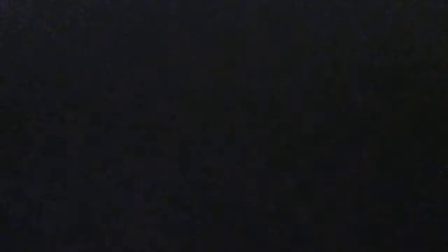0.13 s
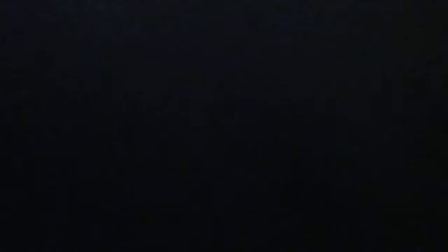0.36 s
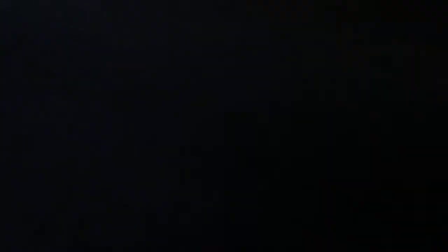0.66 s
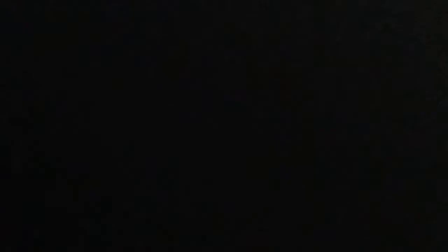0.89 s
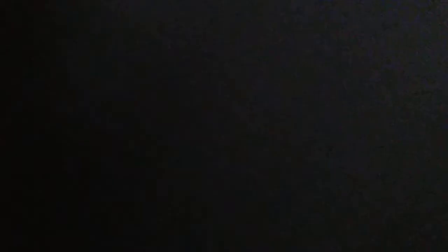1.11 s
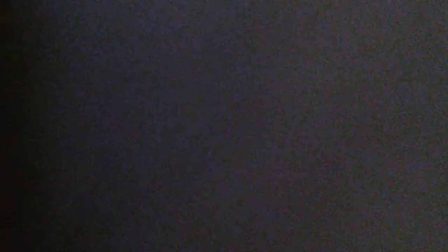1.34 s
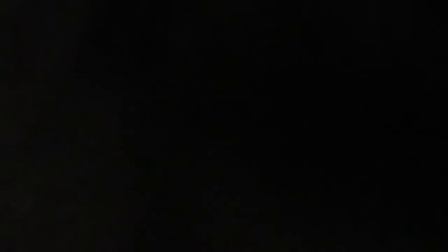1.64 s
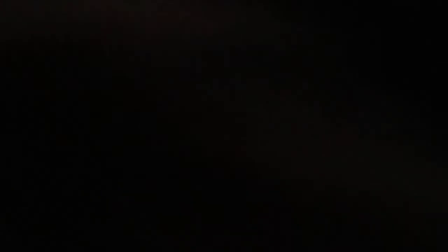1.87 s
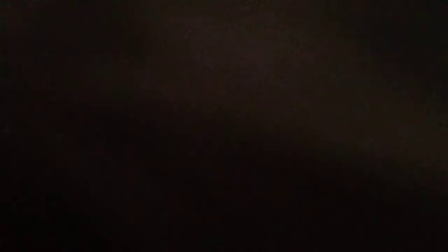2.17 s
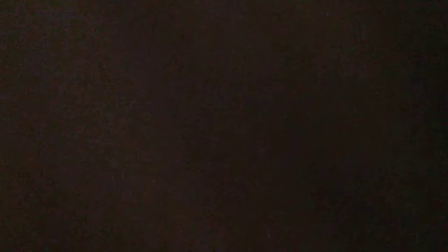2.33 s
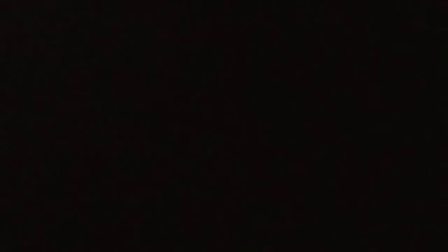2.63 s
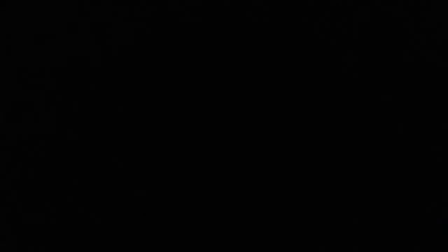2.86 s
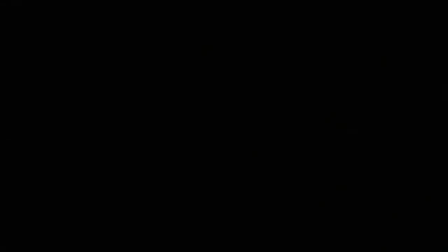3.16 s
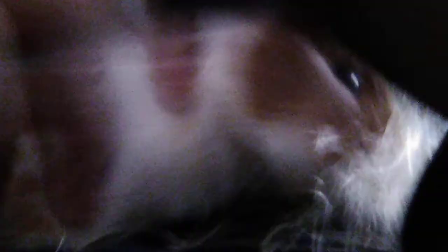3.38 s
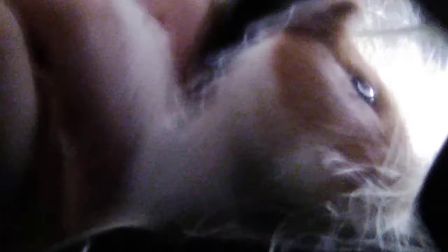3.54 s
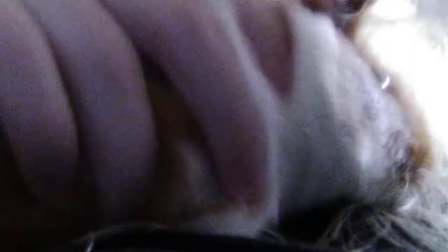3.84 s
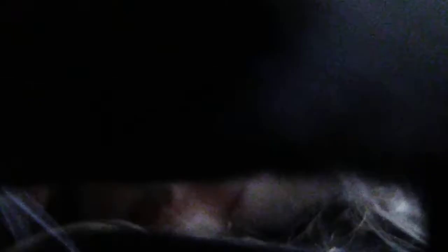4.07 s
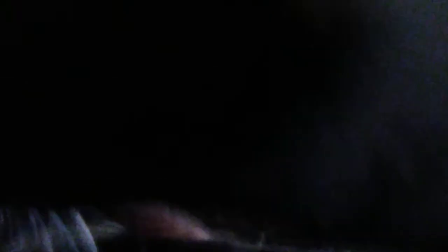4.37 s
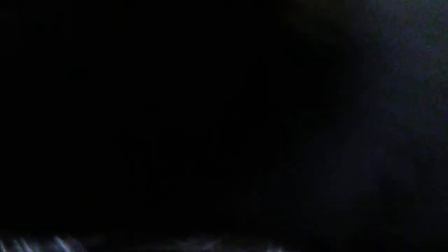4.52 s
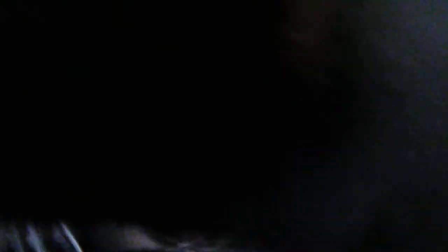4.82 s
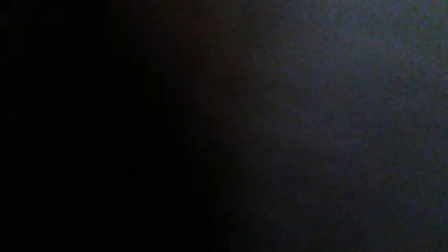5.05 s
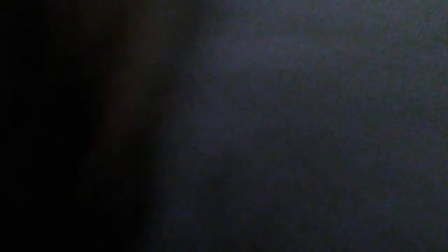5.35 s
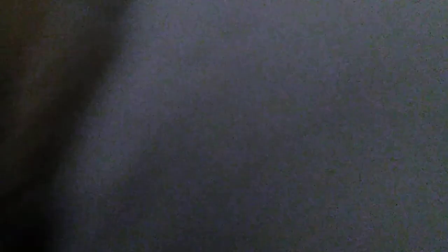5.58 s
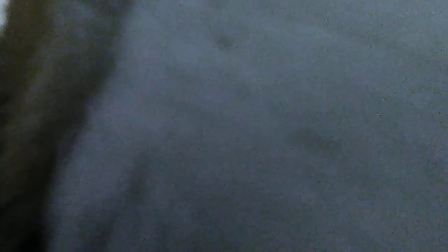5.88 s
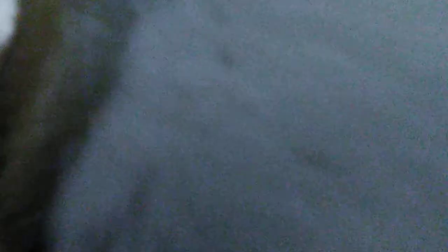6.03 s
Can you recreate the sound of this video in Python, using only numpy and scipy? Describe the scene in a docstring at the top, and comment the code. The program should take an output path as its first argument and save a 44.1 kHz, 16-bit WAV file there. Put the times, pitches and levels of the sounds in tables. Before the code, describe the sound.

A quick overlapping chatter of small rodent squeaks, some raspy, with soft rubbing, a sharp hay snap and late low bumps against the microphone.

```python
"""Baby guinea pigs peep in quick scooping calls inside a small hide, right at a half-covered microphone.
Each peep is a few gliding sine partials; urgent ones break into a rough half-pitch voice.
Fur and a hand rub and scuff the housing (shaped noise) and bump it (short low swings of a sine).
The hay bedding rustles (grainy bright noise) and snaps a few times (ringing modes). A faint hiss
lies under it all, and voices and hay get soft reflections."""
import sys
import numpy as np
from scipy import signal
from scipy.fft import rfft, irfft
from scipy.io import wavfile
from scipy.ndimage import map_coordinates

SR = 44100
rng = np.random.default_rng(int(sys.argv[2]) if len(sys.argv) > 2 else 0)


def transcribe(signal):
    """Save signal, clipped to [-1, 1], as a 16-bit WAV file at the path in sys.argv[1]."""
    frames = np.atleast_2d(signal).T
    limited = np.clip(frames, -1, 1)
    pcm = np.round(limited * 32767).astype(np.int16)
    wavfile.write(sys.argv[1], SR, pcm)


N = 273861
TIME = np.arange(N) / SR


def from_db(db):
    """Turn decibels into a gain."""
    return 10 ** (np.asarray(db) / 20)


def rms_one(x):
    """Scale to an average (rms) size of 1."""
    return x / np.sqrt(np.mean(x ** 2) + 1e-20)


def at_hz(points, hz):
    """Read a spectrum, joining its points by straight lines on a log-frequency axis."""
    point_hz, point_db = np.transpose(points)
    return np.interp(np.log(np.maximum(hz, 1)), np.log(point_hz), point_db)


def noise(colour):
    """Make noise with the given spectrum and rms 1."""
    hz = np.arange(N // 2 + 1) * SR / N
    white = rfft(rng.standard_normal(N))
    return rms_one(irfft(white * from_db(at_hz(colour, hz)), N))


def wander(t, rate):
    """Smooth random wobble of spread about 1, drawn through `rate` random values a second."""
    values = rng.standard_normal(4096)
    return map_coordinates(values, [t * rate], order=3, mode="wrap")


def add(out, start, x):
    """Mix x into out from the time start, in seconds."""
    i = max(int(start * SR), 0)
    out[i:i + len(x)] += x[:max(N - i, 0)]


def hiss():
    """Faint steady noise under everything."""
    # colour of the hiss: f/Hz, level/dB
    hiss_colour = [(100, 13), (500, 9), (1500, 2.5), (4000, 2), (9000, -1), (12500, -3), (14000, -21)]
    return from_db(-89.5) * noise(hiss_colour)


def rubbing(lumpy_db):
    """Fur sticks and slides on the housing: an uneven rumble that swells and fades with each stroke."""
    # strokes of fur over the housing: t/s at the top, level/dB, time to swell or fade by 10 dB/s
    strokes = [(.02, -67.5, 0.28), (.77, -54, 0.0765), (1.03, -66, 0.3322), (1.781, -61, 0.0085),
               (2.2, -77, 0.27), (2.5, -68.5, 0.0978), (2.66, -53.5, 0.0589), (3.14, -63.5, 0.21),
               (3.879, -52.5, 0.0543), (4.1, -55.5, 0.2038), (4.42, -71.5, 0.43), (5.15, -72, 0.02),
               (5.55, -43, 0.0229), (5.68, -43.5, 0.0952), (5.89, -39.5, 0.1039), (6.18, -53.5, 0.15)]
    # colour of the rumble: f/Hz, level/dB
    rub_colour = [(20, -8.5), (50, 3.5), (100, 5.5), (160, -4), (230, -16), (330, -21.5), (700, -31),
                  (1500, -36.5), (2200, -57.5), (5000, -60.5), (14000, -85)]
    power = from_db(-86) ** 2   # the hand never lies quite still
    for top, db, fade in strokes:
        stroke_db = db - 10 * np.abs(TIME - top) / fade
        power = power + from_db(stroke_db) ** 2
    lumps = from_db(lumpy_db * np.tanh(wander(TIME, 30)))
    return np.sqrt(power) * lumps * noise(rub_colour)


def scoop(u, start_hz, turn_hz, end_hz, turn):
    """The pitch glides into its turn and out again; u runs from 0 to 1 through the call."""
    ease = .52   # 0: a glide speeds up all the way from the turn; 1: it levels off at its far end
    away = np.interp(u, [0, np.clip(turn, .1, .9), 1], [1, 0, 1])
    glide = (1 - ease) * away ** 2 + ease * np.sin(np.pi / 2 * away) ** 2
    far_hz = np.where(u < turn, start_hz, end_hz)
    return turn_hz * (far_hz / turn_hz) ** glide


def peep(length, start_hz, turn_hz, end_hz, turn, level_db, swell_db, strain,
         jitter, flutter_db, rasp, slope_db, half_gain_db, rasp_db, shimmer_db):
    """A nearly pure scoop; under strain the vocal folds double their period and flutter."""
    # how each pitch comes through fur and hand: f/Hz, level/dB
    muffle = [(250, -16.5), (430, -5), (600, -8), (800, -0.8266), (1000, 0), (1300, 4), (1600, -1),
              (1850, -13.5), (2100, -10.5), (2400, -26.5), (3700, -19.5), (4600, -35), (8000, -47.5)]
    attack_s, release_s = .0085, 0.00903
    usual_pitch_hz = 925.9
    # second partial: level at the usual pitch, most that strain adds, change as the pitch rises
    overtone_db, overtone_strain_db, overtone_db_per_octave = -21.5, 12, -18
    t = np.arange(int(length * SR)) / SR
    u = t / length
    quaver = np.exp(.018 * wander(t, 130))   # a slight trembling of the pitch
    pitch = scoop(u, start_hz, turn_hz, end_hz, turn) * quaver

    # the voice breaks in fits, mostly in the middle of the call
    fits = from_db(flutter_db * wander(t, 77))
    rough = (0.005 + abs(strain)) * fits * np.sin(np.pi * u) ** 2
    overtones_db = overtone_db + overtone_strain_db * np.tanh(rough)
    overtones_db = overtones_db + overtone_db_per_octave * np.log2(pitch / usual_pitch_hz)
    overtones_db = overtones_db + flutter_db * wander(t, 70)

    # fast pitch shakes grow with roughness
    pitch = pitch * (1 + (jitter + rasp * np.tanh(rough)) * wander(t, 500))
    phase = 2 * np.pi * np.cumsum(pitch) / SR
    partials = [(1, 0.97)]   # (multiple of the pitch, gain)
    for k in range(2, 5):
        partials.append((k, from_db(overtones_db + slope_db * (k - 2))))
    # the doubled period adds partials at 0.5 and 1.5 times the pitch
    for k in range(2):
        unsteady = 1 + 0.2 * wander(t, 250)
        partials.append((k + .5, from_db(half_gain_db) * rough * unsteady))
    voice = np.zeros(len(t))
    for k, gain in partials:
        passed = from_db(at_hz(muffle, k * pitch))
        voice += gain * passed * np.sin(k * phase + rng.uniform(0, 2 * np.pi))

    # uneven swings of the folds smear a rasp between the partials
    rasp_band = signal.cheby1(7, 1, [350, 1700], "band", fs=SR, output="sos")
    uneven = signal.sosfilt(rasp_band, rng.standard_normal(len(t)))
    voice = voice + from_db(rasp_db) * rough * rms_one(uneven)

    level = from_db(level_db + swell_db * (u - .5) + shimmer_db * wander(t, 140))
    level = level / np.sqrt(1 + rough ** 2)   # roughness shares the call's energy
    ramp = np.clip(np.minimum(t / attack_s, (length - t) / release_s), 0, 1)
    edges = np.sin(np.pi / 2 * ramp) ** 2
    return np.sqrt(2) * level * edges * voice


def pups():
    """All the calls, some overlapping, with a bright overtone glide and a short high squeak in own rows."""
    # calls, the overtone glide (at 2.052 s) and the high squeak (at 3.338 s):
    # start t/s, length/s, f/Hz at the start, f/Hz at the turn, f/Hz at the end,
    # place of the turn (0-1), level/dB ahead of muffling, swell from start to end/dB, strain (0-1.5)
    calls = [(0.137, 0.0601, 917, 883, 1420.0, 0.27, -50.5, -0.5, 0.02),
             (0.35, 0.0591, 881.4, 877.4, 1667, 0.41, -51.0, 9, 0.01),
             (0.431, 0.0521, 969, 915, 1420.0, 0.54, -49.0, -2.5, 0.01),
             (0.611, 0.0689, 800.3, 925, 1420, 0.49, -47.5, 3.0, 0.04),
             (0.64, 0.0463, 1847, 1984, 2236, 0.31, -47.5, 11, 0.3),
             (0.716, 0.0527, 1283, 985, 1543, 0.42, -48.0, -10.5, 0.04),
             (0.811, 0.03825, 1247, 1207, 1457, 0.32, -51, -7, 0.01),
             (0.846, 0.0348, 649.5, 868, 845, 0.43, -47.0, -3.5, 0.0),
             (0.895, 0.0263, 1009, 982, 1217, 0.4, -52, -2.5, 0.18),
             (0.961, 0.0641, 987, 897, 1597, 0.33, -47.0, -10, 0.02),
             (1.077, 0.04204, 1214, 1092, 1554, 0.68, -49.0, 3.0, 0.03),
             (1.124, 0.0768, 885.6, 877.5, 1419, 0.33, -49.0, 0.5, 0.0),
             (1.246, 0.0336, 952, 996, 1000, 0.49, -50.5, -1.0, 0.0),
             (1.273, 0.07825, 937.3, 870, 1790, 0.65, -53.0, 9.5, 0.85),
             (1.397, 0.0473, 1430, 1160, 1937, 0.31, -47.5, 7, 0.14),
             (1.406, 0.0866, 923.8, 860.4, 1810, 0.4, -46.0, 4, 0.11),
             (1.524, 0.0538, 957, 1015.5, 1241, 0.29, -47.0, -7, 0.01),
             (1.601, 0.0736, 1100.0, 905, 1496, 0.28, -51.5, 2.5, 0.03),
             (1.674, 0.0562, 1910, 2083, 1103, 0.44, -51.0, 7.5, 0.02),
             (1.719, 0.0861, 947.8, 822, 1615, 0.56, -46.0, -3, 1.5),
             (1.776, 0.0349, 1145, 1550, 1090, 0.62, -47.5, 8, 0.18),
             (1.802, 0.0441, 1184, 1130, 1296, 0.3, -50.0, 1, 0.81),
             (1.832, 0.02875, 832.4, 881, 883, 0.6, -47.5, 9, 0.5),
             (1.985, 0.0869, 992.3, 989, 2216, 0.5, -41.5, 1.5, 0.12),
             (2.017, 0.0352, 1211, 1443, 2090, 0.32, -47.5, 6.5, 0.06),
             (2.052, 0.0199, 2910, 3290, 4350, 0.38, -34.5, 4.5, 0.08),
             (2.1, 0.0421, 1790.0, 1266, 2113, 0.18, -50.0, 4.5, 0.0),
             (2.218, 0.0242, 963, 1079, 940, 0.53, -52.5, 2.5, 0.02),
             (2.29, 0.02405, 1066, 1209, 1201, 0.44, -52.0, 2.5, 0.0),
             (2.434, 0.0755, 1094, 789, 1516, 0.3, -52.5, 12.5, 0.25),
             (2.526, 0.0665, 866.4, 847.5, 1493, 0.5, -49.5, 6.5, 0.11),
             (2.715, 0.04675, 912.3, 1132, 928, 0.62, -49, 10, 0.09),
             (2.754, 0.0338, 928.5, 892.5, 1566, 0.28, -47.0, 1, 0.0),
             (2.839, 0.0368, 1558, 1181, 1780, 0.53, -52.5, 13.5, 0.09),
             (2.874, 0.0303, 1936, 1966, 2170, 0.59, -46.5, -6.0, 0.0),
             (2.894, 0.0398, 2167, 1266, 1474, 0.43, -45, -0.5, 0.14),
             (2.923, 0.05716, 1437, 1579, 1137, 0.67, -45.0, -0.5, 0.02),
             (2.984, 0.0591, 1182, 951, 1636, 0.19, -52.5, -6, 0.01),
             (3.07, 0.07614, 951.2, 892.7, 1640, 0.59, -45.5, 3, 0.44),
             (3.297, 0.08996, 862, 790.0, 1796, 0.49, -48.5, -1.5, 0.48),
             (3.338, 0.01344, 3800.0, 3730, 2940, 0.51, -32.5, 2.5, 0.0),
             (3.391, 0.0484, 784.4, 1230.0, 1700, 0.85, -62.5, -14, 0.1),
             (3.58, 0.0261, 943, 954, 1080, 0.49, -60, 6.5, 0.0),
             (3.63, 0.0258, 890.0, 953, 934, 0.46, -61.0, -1, 0.0),
             (3.672, 0.0283, 1039, 1358, 1800, 0.82, -58.5, -11.5, 0.04),
             (3.768, 0.0877, 890.5, 688.3, 804.3, 0.33, -44.0, 9.5, 0.0),
             (3.884, 0.0352, 1033, 820, 718, 0.31, -63.5, -6.0, 0.02),
             (3.921, 0.0283, 960.0, 1475, 1560.0, 0.74, -73.0, 3.5, 0.0),
             (3.994, 0.06225, 1055, 1124, 2020, 0.3, -56.0, 4.5, 0.1),
             (4.181, 0.0709, 1087, 898, 670, 0.3, -53.5, 5.5, 0.0),
             (4.207, 0.054, 723.1, 1227, 1260, 0.79, -55.5, -11.5, 0.06),
             (4.29, 0.0582, 1265, 1050.0, 1540.0, 0.34, -52.0, -6, 0.0),
             (4.351, 0.0944, 886.2, 780.5, 1400, 0.56, -47.5, 8.0, 0.35),
             (4.434, 0.0241, 1750.0, 1947, 1750.0, 0.55, -41.5, 3, 0.05),
             (4.454, 0.073, 1674, 829, 1340, 0.43, -46.0, -3, 0.14),
             (4.52, 0.0179, 1395, 2050, 1830, 0.37, -49.5, -11.5, 0.01),
             (4.586, 0.0606, 1237, 1010.0, 1384, 0.35, -55.5, 1.5, 0.02),
             (4.665, 0.0847, 760.3, 789.6, 1574, 0.48, -47.5, 1.5, 0.03),
             (4.771, 0.05866, 1060.0, 826.5, 1326, 0.56, -47.5, -2.5, 0.03),
             (4.963, 0.0722, 988, 701, 1477, 0.43, -46.0, 2.5, 0.23),
             (5.033, 0.0357, 2132, 1887, 2036, 0.41, -41.5, 6, 0.04),
             (5.065, 0.0618, 1573, 896, 1263, 0.43, -45.0, 1, 0.02),
             (5.122, 0.0316, 1903, 2130.0, 1930, 0.52, -44, -5.5, 0.0),
             (5.155, 0.0571, 1036, 760, 976, 0.27, -46.5, -7.5, 0.75),
             (5.216, 0.0441, 1088, 956, 1533, 0.46, -55.5, -6, 0.0),
             (5.302, 0.08874, 1144, 744, 1770, 0.38, -45.5, 4.5, 0.09),
             (5.413, 0.0359, 830.0, 850, 766, 0.26, -49, -2.0, 0.43),
             (5.562, 0.0907, 751.4, 693, 1810, 0.43, -44.5, 1.5, 0.59),
             (5.651, 0.0601, 1879, 799, 1027, 0.45, -44.5, -5.5, 0.49),
             (5.699, 0.0431, 758, 1283, 866, 0.52, -42.5, -1.0, 0.15),
             (5.908, 0.05655, 482.8, 705, 716, 0.51, -46, -1, 0.0),
             (5.961, 0.0243, 1040.0, 1121, 846, 0.73, -50.0, 12.5, 0.0),
             (6.007, 0.01127, 764.6, 1115, 1195, 0.27, -54.0, -13.5, 0.01),
             (6.142, 0.0689, 485.6, 723.4, 656, 0.44, -45.5, 0.5, 0.02)]
    out = np.zeros(N)
    for start, *call in calls:
        add(out, start, peep(*call, jitter=0.0026, flutter_db=4.0, rasp=.03, slope_db=-10,
                             half_gain_db=0.5, rasp_db=-13.5, shimmer_db=1.27))
    return out


def room(x, t60, wet_db, wall_hz):
    """Dense, dull reflections from the hide and the room around it, fading by 60 dB in t60 seconds."""
    t = np.arange(SR // 2) / SR
    tail = rng.standard_normal(len(t)) * from_db(-60 * t / t60) * (t > .004)
    tail = tail / np.sqrt(np.sum(tail ** 2))
    # the walls soak up treble
    tail = signal.sosfilt(signal.butter(1, wall_hz, fs=SR, output="sos"), tail)
    return from_db(wet_db) * signal.fftconvolve(x, tail)[:N]


def brushes(strokes, colour, grain_db, rise_s):
    """Short strokes of grainy friction that start quickly and fade."""
    force = np.zeros(N)
    t = np.arange(SR // 2) / SR
    for start, db, fade in strokes:
        add(force, start, from_db(db) * (1 - np.exp(-t / rise_s)) * np.exp(-t / fade))
    grain = from_db(grain_db * wander(TIME, 370))
    return force * grain * noise(colour)


def rustles():
    """Hay brushes past: short strokes of bright, grainy friction noise."""
    # strokes: t/s, level/dB ahead of rise and fade, fading time (to 1/e)/s
    hay_strokes = [(.479, -73, .002), (.739, -65.5, 0.00496), (.757, -54, 0.00182), (.975, -74.5, 0.00414),
                   (3.345, -60, 0.0028), (4.035, -78, 0.039), (5.673, -64.5, 0.027), (5.686, -51, .007),
                   (5.705, -72.5, 0.0432)]
    # colour of the hay: f/Hz, level/dB
    hay_colour = [(1500, -33), (2500, -18), (3100, 10), (4200, 8.5), (4900, 2), (5600, -23), (7300, -24),
                  (12000, -30.5)]
    return brushes(hay_strokes, hay_colour, grain_db=4.0, rise_s=0.0013)


def snaps(octaves, rise_s):
    """Stalks snap at the housing: each rings the modes near its own brightest pitch hardest."""
    # snaps: t/s, peak level/dB, brightest f/Hz
    stalks = [(.674, -28, 6800), (4.0112, -19.5, 3083), (4.022, -29, 9540), (4.0255, -29.5, 1780)]
    # their ringing modes: f/Hz, level/dB, time to fade by 60 dB/s
    modes = [(1296, 1.5, 0.0042), (3316, -10, 0.0067), (4472, 5, 0.0029), (7294, -7, 0.0082),
             (8920, -5.5, 0.0053), (10935, -5, 0.0076), (13900, -9, .005)]
    out = np.zeros(N)
    t = np.arange(SR // 20) / SR
    for start, peak_db, bright_hz in stalks:
        ring = np.zeros(len(t))
        for hz, db, t60 in modes:
            nearness = 1 / (1 + (np.log2(hz / bright_hz) / octaves) ** 2)
            ring += from_db(db - 60 * t / t60) * nearness * np.cos(2 * np.pi * hz * t)
        ring = ring * (1 - np.exp(-t / rise_s))
        add(out, start, from_db(peak_db) * ring / np.abs(ring).max())
    return out


def scuffs():
    """Fur and paws scuff the housing: short strokes of dull friction noise."""
    # strokes: t/s, level/dB ahead of rise and fade, fading time (to 1/e)/s
    paw_strokes = [(.74, -46.5, 0.0121), (.781, -36.5, 0.00553), (.823, -56.5, 0.0097),
                   (1.025, -60.5, 0.033), (1.368, -49.5, 0.00825), (1.722, -49, 0.0321),
                   (1.747, -45, 0.0295), (1.795, -46.5, 0.0237), (2.472, -51.5, 0.0139),
                   (2.53, -51, 0.0087), (3.1, -59.5, 0.035), (5.004, -56.5, 0.0056), (4.027, -41.5, 0.0084),
                   (5.625, -38, 0.0279), (5.67, -46.5, 0.1023), (5.908, -38.5, 0.0097)]
    # colour of the scuffs: f/Hz, level/dB
    paw_colour = [(60, 4.5), (250, 10), (550, 8.5), (900, -10.5), (1600, -10.5), (2200, -37.5), (6000, -43),
                  (14000, -63)]
    return brushes(paw_strokes, paw_colour, grain_db=3.0, rise_s=.0012)


def bumps():
    """A padded push swells and dies within a few swings of the housing."""
    # soft bumps: t/s at the top, peak level/dB, f/Hz, half length (top to 1/e)/s
    pushes = [(0.749, -48.5, 83.2, .015), (0.787, -59, 75, .012), (1.054, -52.5, 202, 0.0117),
              (2.641, -48, 96.7, 0.0214), (3.87, -52, 148.7, 0.012), (3.884, -41, 70, 0.0234),
              (4.015, -42, 72, 0.0166), (5.153, -49, 99, 0.007), (5.562, -33, 96.6, 0.011),
              (5.635, -11.5, 98.3, 0.00919), (5.634, -27.5, 212.9, 0.0083), (5.683, -49, 60.1, .015),
              (5.875, -25.5, 98, .012), (5.908, -25, 50.2, 0.0221), (6, -28, 71.5, 0.01346)]
    out = np.zeros(N)
    for top, db, hz, half in pushes:
        t = TIME - top
        swell = np.exp(-(t / half) ** 2)
        out += from_db(db) * swell * np.sin(2 * np.pi * hz * t + rng.uniform(0, 2 * np.pi))
    return out


def scene():
    """Voices and hay sound through the air; rubs, scuffs and bumps come through the housing."""
    voices = pups()
    hay = snaps(octaves=.8, rise_s=.0001) + rustles()
    air = voices + room(voices, t60=0.17, wet_db=-15.5, wall_hz=4100)
    air = air + hay + room(hay, t60=.3, wet_db=-24.0, wall_hz=6124)
    contact = rubbing(lumpy_db=6.5) + bumps() + scuffs()
    return (air + contact + hiss())[None]


def record(dry):
    """A steep low-pass filter cuts off the top of the treble."""
    cutoff_hz = 14600
    return signal.sosfilt(signal.ellip(10, .1, 80, cutoff_hz, fs=SR, output="sos"), dry)


dry = scene()
out = record(dry)
transcribe(out)
```